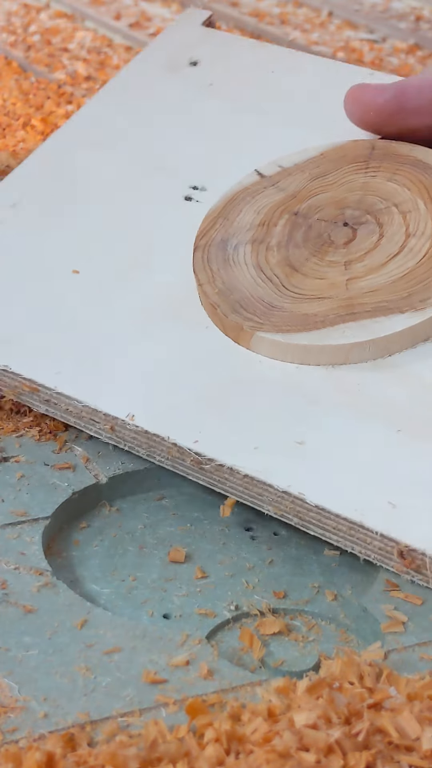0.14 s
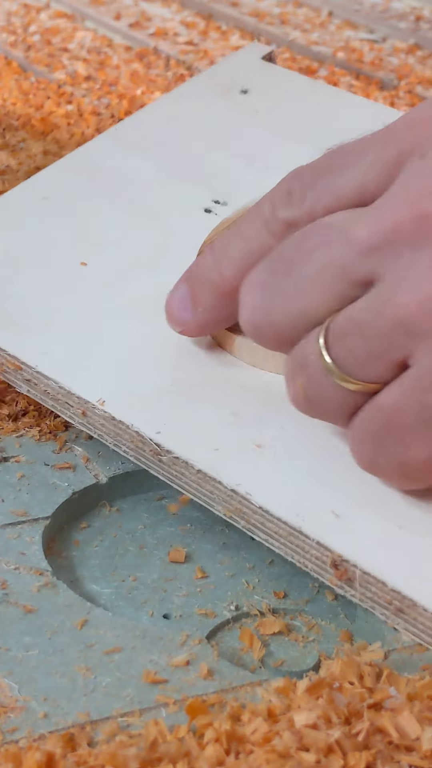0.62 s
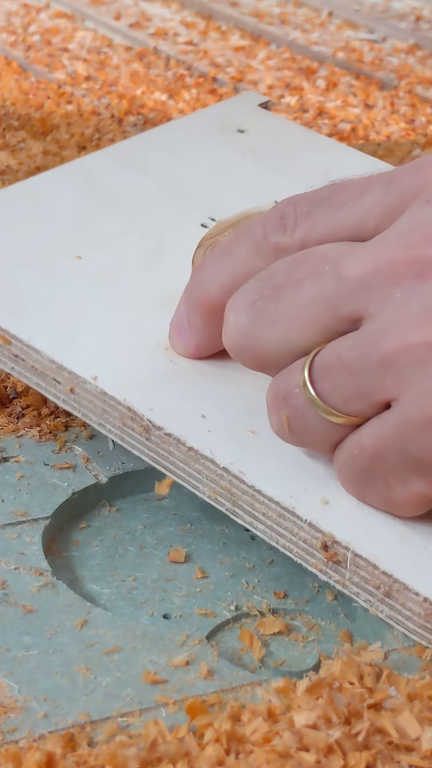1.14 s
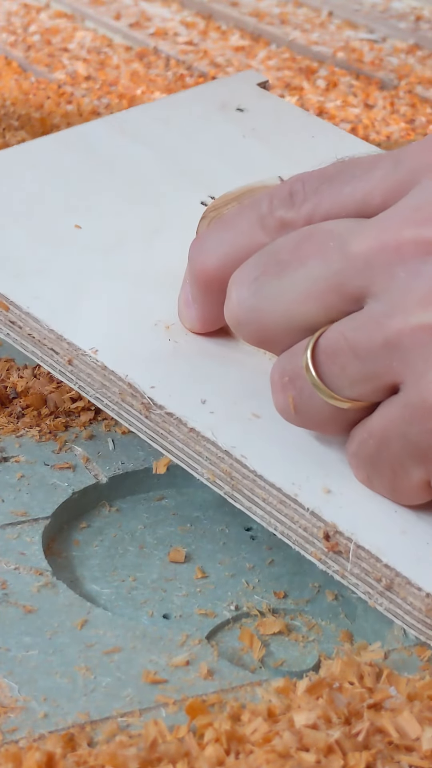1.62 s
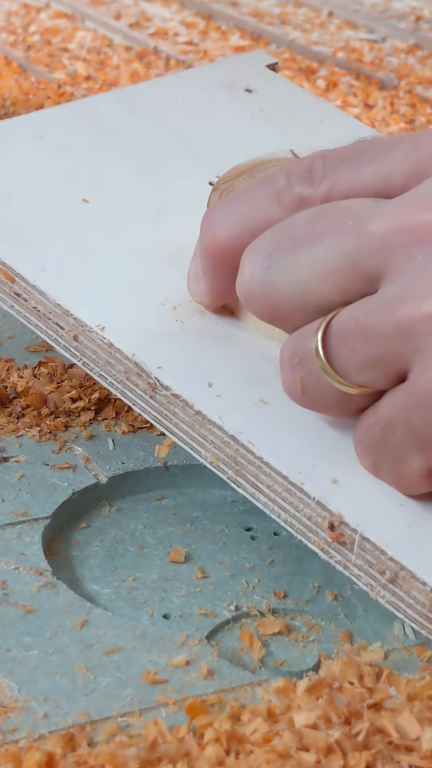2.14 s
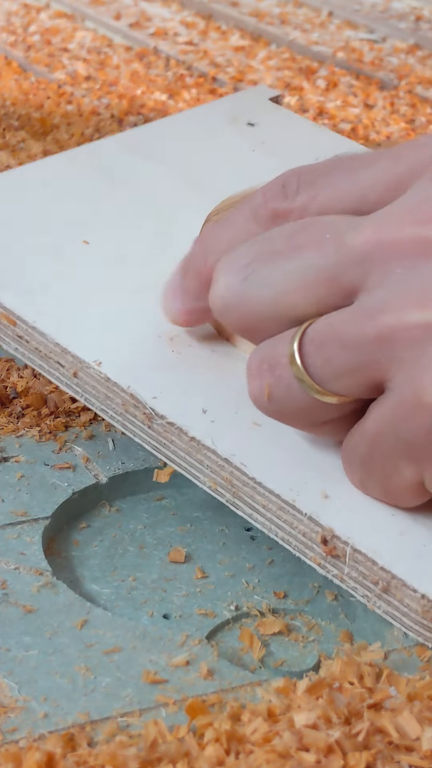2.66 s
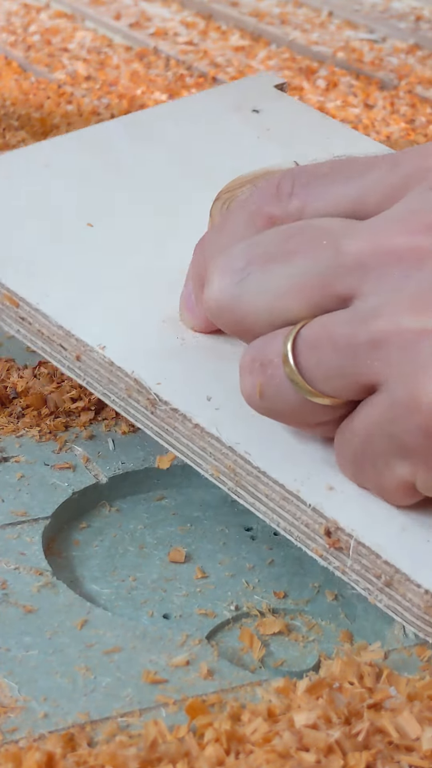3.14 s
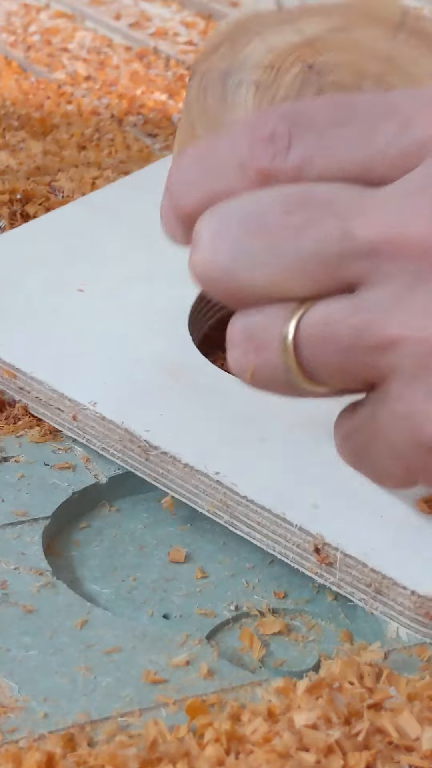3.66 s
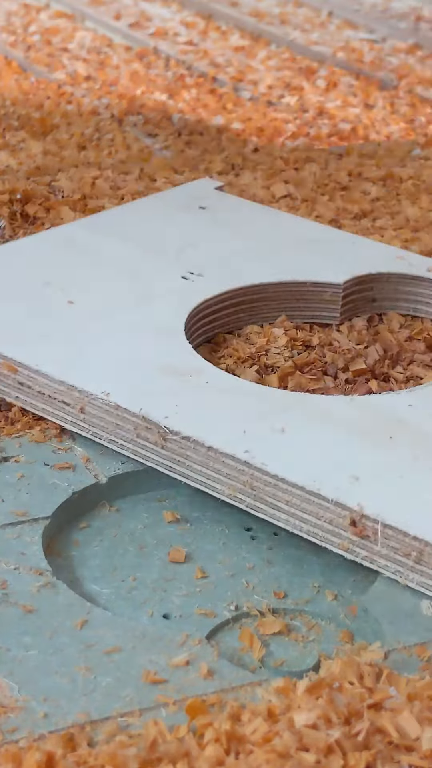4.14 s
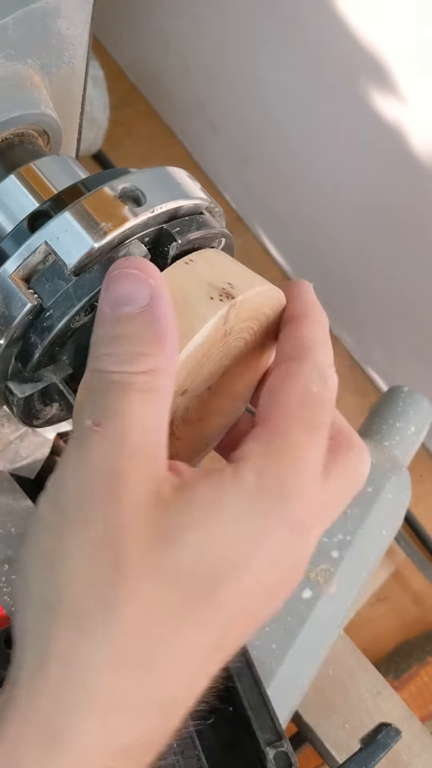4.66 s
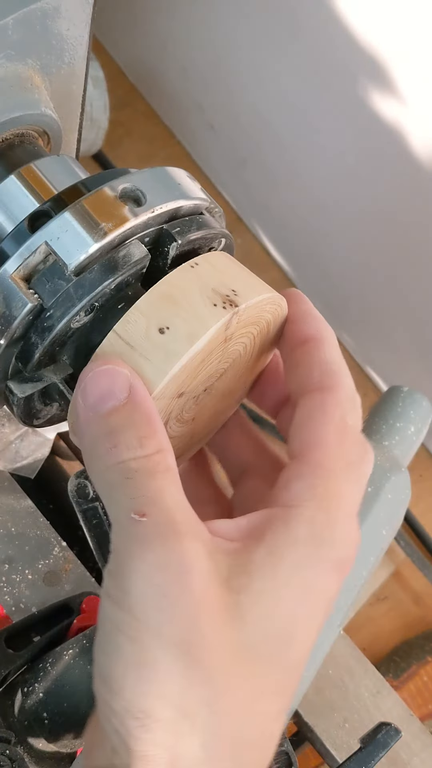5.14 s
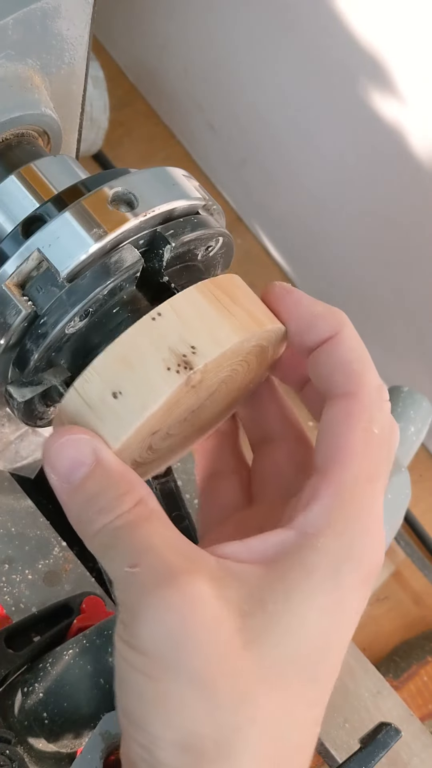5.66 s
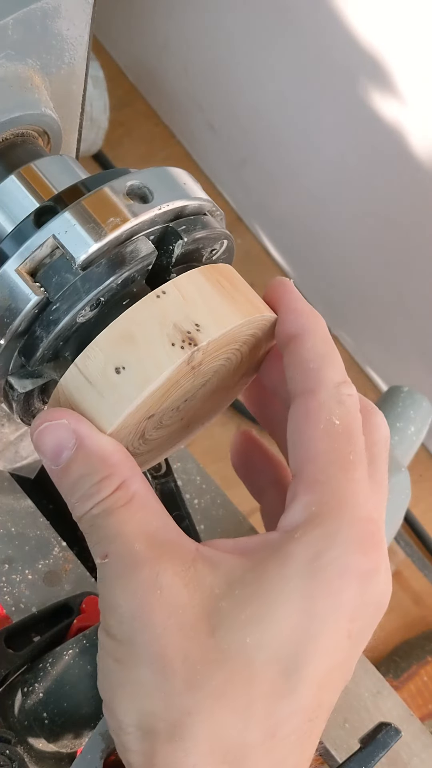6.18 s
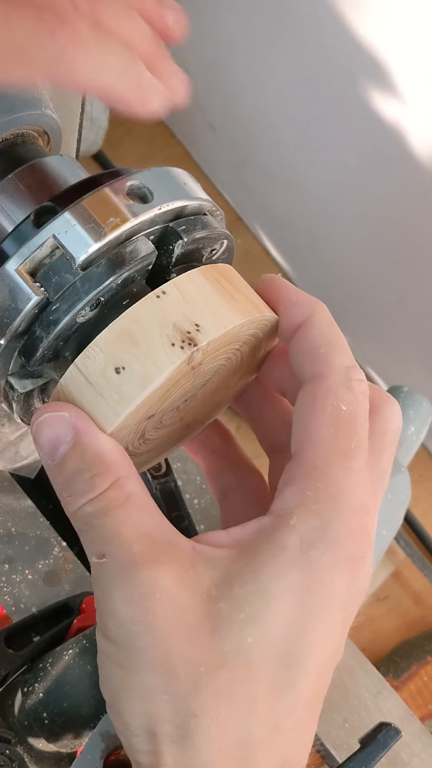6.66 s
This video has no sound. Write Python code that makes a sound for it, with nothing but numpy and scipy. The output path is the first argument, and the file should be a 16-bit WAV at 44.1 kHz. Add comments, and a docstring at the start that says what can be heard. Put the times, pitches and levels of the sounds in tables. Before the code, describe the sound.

Wooden disc snaps and squeaks out of a plywood sheet over a faint machine whine, then knocks into a steel lathe chuck.

```python
"""Quiet workshop in two scenes, heard by a two-port microphone over hum, rumble and room air. First a wooden disc
is pressed out of a plywood sheet while an idle machine whines: snaps and knocks ring damped modes, crack and wake
frame and room; hands rub (filtered noise), the tight fit squeaks, the sheet drags and drops (narrow noise bands).
Then the disc is seated in a steel lathe chuck: a soft bump rings the bed, the jaws knock in longer steel modes,
hands rub, and faint, thin rising chirps sound near the end, over a blurred whistle that dies away."""
import sys
import numpy as np
from scipy import signal
from scipy.fft import rfft, irfft, next_fast_len
from scipy.io import wavfile
from scipy.ndimage import map_coordinates

SR = 44100
rng = np.random.default_rng(int(sys.argv[2]) if len(sys.argv) > 2 else 0)


def store_wav(level_fs):
    """Save 16-bit WAV to argv[1]."""
    pcm = np.round(np.clip(np.atleast_2d(level_fs), -1, 1) * 32767)
    wavfile.write(sys.argv[1], SR, pcm.T.astype(np.int16))


def invert_db(level):
    """Linear amplitude ratio for a level in decibels (20 dB per decade), elementwise."""
    return 10 ** (np.asarray(level, dtype=float) / 20)


N = 299439
CUT_S = 4.327  # from the sheet on the table to the lathe
TABLE_LAG_SAMPLES, LATHE_LAG_SAMPLES = -4, -3.5  # delay of the left port behind the right, in samples; negative: left first


def unit(x):
    """Scale to rms 1."""
    return x / np.sqrt(np.mean(x ** 2) + 1e-20)


def along(points, hz):
    """Interpolate (hz, value) points on a log frequency axis."""
    f, v = np.transpose(points)
    return np.interp(np.log(hz + 1), np.log(f + 1), v)


def wobble(rate_hz):
    """Smooth random curve with rate_hz knots a second."""
    knots = rng.standard_normal(int(N * rate_hz / SR) + 4)
    return map_coordinates(knots, [np.arange(N) * rate_hz / SR])


def at_table():
    """True for samples before the cut."""
    return np.arange(N) < CUT_S * SR


def filtered(x, response):
    """Multiply the spectrum of x by a response(hz), complex or real."""
    n = x.shape[-1]
    m = next_fast_len(n + 8192)
    return irfft(rfft(x, m) * response(np.fft.rfftfreq(m, 1 / SR)), m)[..., :n]


def rush(spectrum):
    """Stereo noise of rms 1; the mid/side split sets the likeness of the ports at each frequency."""
    # hz, left_right_correlation
    alike = [(60, 1), (130, 0.74), (290, 0.6), (640, 0.52), (1410, -0.48), (3100, -.35), (6820, -0.1)]

    def mid_side(hz):
        angle = np.arccos(np.clip(along(alike, hz), -1, 0.92)) / 2
        return invert_db(along(spectrum, hz)) * [np.cos(angle), np.sin(angle)]

    mid, side = filtered(rng.standard_normal((2, N)), mid_side)
    return unit(np.array([mid + side, mid - side]))


def near(x):
    """Close source: reaches the left port first, with a port balance set by frequency and place."""
    # balance at the table: hz, left_over_right_db
    table_left = [(60, 17), (180, 7), (550, 2.5), (1650, 2), (4970, 13.5), (15000, -13.5)]
    # balance at the lathe: hz, left_over_right_db
    lathe_left = [(60, 7), (180, 3.5), (550, 1), (1650, -0.5), (4970, 1), (15000, 12)]
    side = np.array([[1], [-1]]) / 2

    def place(lag_samples, left):
        def response(hz):
            delay = np.exp(-2j * np.pi * hz * side * lag_samples / SR)
            return invert_db(side * along(left, hz)) * delay
        return filtered(x, response)

    table = place(TABLE_LAG_SAMPLES, table_left)
    lathe = place(LATHE_LAG_SAMPLES, lathe_left)
    return np.where(at_table(), table, lathe)


def cluster(bands, rise_s, shared):
    """Modes too close to count beat together: narrow dying noise, bands x ports x samples."""
    rattle_db, rattle_rate_hz = 3, 73  # loose parts make the ringing uneven
    hz, width_hz, db, t60_s = np.transpose(bands)[:, :, None, None]
    t = np.arange(SR) / SR
    common, left, right = rng.standard_normal((3, SR))
    source = shared * (1 + 400 / hz) * common + [left, right]  # long waves reach both ports alike
    narrow = filtered(source, lambda f: 1 / (1 + ((f - hz) / (width_hz / 2)) ** 4))
    narrow = narrow / narrow.std((1, 2), keepdims=True)
    knots = rng.standard_normal((len(bands), rattle_rate_hz + 2))
    rattle = np.array([np.interp(t * rattle_rate_hz, np.arange(len(k)), k) for k in knots])[:, None]
    return narrow * invert_db(rattle_db * rattle + db - 60 * t / t60_s) * (1 - np.exp(-t / rise_s))


def tones(lines, waver_db, drift_rad):
    """Sines unsteady in level and phase, the phase offset between ports growing with frequency."""
    t = np.arange(N) / SR
    port_phase = np.array([[1], [-1]]) * np.pi * TABLE_LAG_SAMPLES / SR
    total = np.zeros((2, N))
    for hz, rms_db in lines:
        level = np.sqrt(2) * invert_db(rms_db + waver_db * wobble(8.8))
        drift = drift_rad * np.sqrt(hz / 800) * wobble(6.7)
        total += level * np.sin(2 * np.pi * hz * t + drift - port_phase * hz)
    return total


def whistle(hz, rms_db, left_db, wander_hz, rate_hz):
    """One thin line that never holds its pitch: a sine of randomly wandering frequency."""
    phase = 2 * np.pi * np.cumsum(hz + wander_hz * wobble(rate_hz)) / SR
    balance_db = left_db * np.array([[0.5], [-0.5]])
    return np.sqrt(2) * invert_db(rms_db + 2.3 * wobble(8) + balance_db) * np.sin(phase)


def hum():
    """Mains-driven motor in both scenes: low, drifting lines."""
    # hz, rms_db
    hum_lines = [(119, -66.5), (247, -81.5)]
    return tones(hum_lines, waver_db=1.5, drift_rad=2.4)


def rumble():
    """Lumpy low noise, its level and colour changing at the cut."""
    # one table a scene: time_s, level_db
    levels = [
        [(0.0, -63), (2.95, -71.5), (3.6, -63.5), (4.1, -65.5)],
        [(4.4, -67), (6.32, -70), (6.79, -87)],
    ]
    # one table a scene: hz, level_db_per_hz
    colours = [(15, -5), (30, 0.5), (55, 15), (85, -10.5), (130, -46.5)], [(15, -40), (30, -13.5),
               (55, 6.5), (85, 3.5), (130, -29)]
    t = np.arange(N) / SR
    table, lathe = [invert_db(np.interp(t, *np.transpose(rows))) * rush(colour)
                    for rows, colour in zip(levels, colours)]
    return np.where(at_table(), table, lathe)


def table_air():
    """Room air whose low part swells, with the whine of an idle machine and a thin whistle."""
    # hz, level_db_per_hz
    air_colour = [(60, -12), (90, -4), (130, -8.5), (160, -12.5), (250, -15), (700, -16.5), (1150, -22.5),
                  (2350, -18.5), (3000, -28.5), (5500, -32), (7300, -44), (9600, -36), (15800, -42.5)]
    # idle machine: hz, rms_db
    whine_lines = [(500, -75.5), (646, -77), (807, -67.5), (1846, -80), (2353, -77.5)]
    steady = invert_db(-59.5) * rush(air_colour)
    low = filtered(steady, lambda hz: hz < 1480)
    swell = (invert_db(2.0 * wobble(11)) - 1) * low
    whine = tones(whine_lines, waver_db=1.04, drift_rad=0.13)
    return steady + swell + whine + whistle(6745, rms_db=-86.5, left_db=4.5, wander_hz=33.5, rate_hz=6)


def lathe_air():
    """Wavering room air and a dying whistle that wanders so fast that it blurs into a band."""
    # hz, level_db_per_hz
    air_colour = [(53, -69), (90, -22), (102, -5.5), (124, -8), (289, -23.5), (476, -26.5), (1180, -35),
                  (1290, -29.5), (1670, -33.5), (6370, -44.5), (7250, -55), (10900, -52), (15800, -47)]
    fade_db_per_s = 4
    after_cut_s = np.arange(N) / SR - CUT_S
    blur = whistle(2480, rms_db=-82, left_db=0, wander_hz=160, rate_hz=400)
    return invert_db(-61 + 1.5 * wobble(6.3)) * rush(air_colour) + blur * invert_db(-fade_db_per_s * after_cut_s)


def rubs():
    """Sliding wood is uneven grit through the resonances of sheet or disc; skin only hisses."""
    # strokes of hands and sheet: start_s, length_s, scrape_db, skin_hiss_db
    strokes = [(-.05, 0.31, -70.5, -75), (0.165, 0.21, -63.5, -77), (0.365, 0.26, -63, -84),
               (0.591, 0.25, -65.5, -87), (2.83, 0.067, -64, -89), (2.959, 0.027, -63.5, -90),
               (3.42, 0.064, -47, -61), (3.725, 0.67, -65.5, -69.5), (4.072, 0.086, -68, -70),
               (4.186, 0.016, -49.5, -60), (4.214, 0.065, -63, -78), (4.299, 0.19, -69, -66.5),
               (4.606, 0.046, -60, -70), (5.038, 0.24, -63, -62), (5.245, 0.029, -47.5, -67),
               (5.269, 0.019, -47.5, -75), (5.335, 0.12, -62, -68), (5.522, 0.16, -67, -75.5),
               (5.691, 0.13, -66.5, -69), (5.754, 0.056, -53.5, -72), (5.879, 0.058, -59, -66),
               (6.112, 0.013, -44.5, -57.5), (6.595, 0.2, -79.5, -72.5)]
    # sheet resonances: hz, width_hz, level_db
    sheet_peaks = [(606, 2730, 5), (1550, 520, 11.5), (2345, 180, 8), (2900, 410, 10), (3680, 850, 0.5),
                   (4560, 290, 8.5), (5860, 1500, -2), (6580, 1700, -24)]
    # disc on jaws: hz, width_hz, level_db
    grip_peaks = [(885, 1500, 4), (1330, 150, 7.5), (2700, 590, -10), (5760, 570, -13)]
    # skin hiss: hz, level_db_per_hz
    skin_colour = [(5000, -11), (7500, -5), (9000, -6), (9800, 1), (10700, -4), (11800, 0), (12700, -8.5),
                   (14400, -10), (15800, -9)]
    grip_top_hz = 7040
    start_s, length_s, scrape_db, hiss_db = np.transpose(strokes)
    progress = np.clip((np.arange(N)[:, None] / SR - start_s) / length_s, 0, 1)
    pressure = np.sin(np.pi * progress ** 0.7) ** 0.7  # rises fast, eases off
    grit = rng.standard_normal(N) * invert_db(1.0 * wobble(9.1) + 0.72 * wobble(40) + 3.2 * wobble(300))

    def body(peaks):
        def response(f):
            total = 0
            for k, (hz, width_hz, db) in enumerate(peaks):
                damping = 1j * f * width_hz
                total = total + (-1) ** k * invert_db(db) * damping / (hz * hz - f * f + damping)
            return total
        return unit(filtered(grit, response))

    grip = filtered(body(grip_peaks), lambda hz: 1 / (1 + (hz / grip_top_hz) ** 6))
    wood = np.where(at_table(), body(sheet_peaks), grip)
    scrape = near(pressure @ invert_db(scrape_db) * wood)
    hiss = pressure @ invert_db(hiss_db) * invert_db(2.1 * wobble(34)) * rush(skin_colour)
    return scrape + hiss


def chirps():
    """Faint, thin rising chirps near the end: upward sine glides that swell and fade."""
    # start_s, start_hz, peak_db
    glides = [(6.619, 9600, -65.5), (6.652, 12650, -79)]
    length_s, glide_hz_per_s = 0.029, 14900
    start_s, hz, db = np.transpose(glides)[:, :, None]
    t = np.clip(np.arange(N) / SR - start_s, 0, length_s)
    swell = np.sin(np.pi * t / length_s)
    phase = 2 * np.pi * (hz * t + glide_hz_per_s * t ** 2 / 2)
    return near(np.sum(invert_db(db) * swell * np.sin(phase), 0))


def drag():
    """The freed sheet slides over the table, singing in narrow uneven bands, then drops with a rumble."""
    # singing: hz, width_hz, level_db
    drag_bands = [(1510, 140, -67.5), (1900, 150, -67), (2170, 150, -63), (2450, 120, -64.5),
                  (3530, 260, -60.5), (4480, 500, -65.5), (5430, 440, -67.5)]
    # drop rumble: hz, width_hz, level_db, t60_s
    drop_bands = [(40, 28, -53.5, 1), (100, 120, -52, 0.39), (353, 490, -53.5, 0.45)]
    start_s, length_s, drop_s = 3.87, 0.29, 4.192
    song, thud = np.zeros((2, 2, N))
    undying = [(*band, np.inf) for band in drag_bands]
    song[:, round(start_s * SR):][:, :SR] = cluster(undying, rise_s=0.18, shared=0.42).sum(0)
    thud[:, round(drop_s * SR):][:, :SR] = cluster(drop_bands, rise_s=0.0028, shared=1.7).sum(0)
    progress = np.clip((np.arange(N) / SR - start_s) / length_s, 0, 1)
    pressure = np.sin(np.pi * progress ** 1.4) ** 0.2  # grows until the sheet lifts
    return song * pressure * invert_db(1.9 * wobble(31)) + thud * at_table()


def squeaks():
    """Brief slips of the tight fit each ring one band; the shorter, the wider."""
    # start_s, hz, level_db, t60_s
    slips = [(0.102, 12400, -46, 0.018), (2.622, 2470, -42, 0.014), (2.689, 1910, -51, .02),
             (2.848, 2900, -54, .06), (2.963, 2700, -50, 0.022), (2.987, 2855, -50, .09),
             (4.132, 2180, -48, 0.084), (4.134, 2450, -50, .07), (4.134, 1900, -55, .06),
             (5.251, 2700, -42, .04), (5.274, 2700, -42, 0.044), (5.426, 2700, -56, .04),
             (5.519, 2700, -48.5, .05), (5.789, 2800, -40.5, 0.018)]
    width_times_t60 = 12.6
    x = np.zeros((2, N + SR))
    for start_s, hz, db, t60_s in slips:
        band = (hz, width_times_t60 / t60_s, db, t60_s)
        x[:, round(start_s * SR):][:, :SR] += cluster([band], rise_s=0.17 * t60_s, shared=2.9)[0]
    return x[:, :N]


def bed_bump():
    """A soft bump sets the lathe bed ringing in clusters of modes."""
    # start_s, level_db
    bumps = [(4.609, -41)]
    # hz, width_hz, level_db, t60_s
    bed_bands = [(225, 130, -5, 0.26), (400, 280, -9.5, 0.35), (695.5, 90, -5.5, 0.45),
                 (1320, 130, -20, 0.79), (1742, 300, -24.5, 0.17), (2000, 2000, -22, .5),
                 (2730, 170, -16, 0.33)]
    x = np.zeros((2, N + SR))
    for start_s, db in bumps:
        x[:, round(start_s * SR):][:, :SR] += invert_db(db) * cluster(bed_bands, rise_s=0.00077, shared=1.2).sum(0)
    return x[:, :N]


def ring(modes, rise_s, sustain):
    """Dying sines, one row a mode; each contact point varies strengths, phases and upper pitches."""
    hz, db, t60_s = np.transpose(modes)[:, :, None]
    t = np.arange(SR // 2) / SR
    level_luck, phase_luck, pitch_luck = rng.standard_normal((3, len(modes), 1))
    hz = hz * (1 + 0.04 * pitch_luck * (hz > 1600))
    level = invert_db(db + 2.5 * level_luck - 60 * t / (t60_s * sustain))
    return level * np.sin(2 * np.pi * hz * t + 0.5 * phase_luck) * (1 - np.exp(-t / rise_s))


def tail(colour, shared):
    """Fresh stereo room answer: dense early scatter, then each frequency dies at its own speed."""
    # hz, t60_s
    room_decay = [(200, 0.11), (700, 0.52), (1500, 0.45), (4000, 0.63), (8000, 0.58), (14000, 0.33)]
    common, left, right = rng.standard_normal((3, SR))
    hz, t, z = signal.stft([shared * common + left, shared * common + right], SR, nperseg=256)
    late = invert_db(-60 * t / along(room_decay, hz)[:, None])
    early = invert_db(3.0 - 60 * t / 0.086)
    z = z * invert_db(along(colour, hz)[:, None]) * (late + early)
    x = signal.istft(z, SR, nperseg=256)[1][:, :SR]
    return x / x[:, :SR // 20].std() * (1 - np.exp(-np.arange(SR) / SR / 0.00075))


def crack(level_db, edge_hz, t60_s):
    """Splintering: three dying noises above 1800 Hz, the treble rolled off at edge_hz."""
    t = np.arange(SR // 2) / SR
    noise = rng.standard_normal((3, len(t)))
    bright = filtered(noise, lambda hz: (hz > 1800) / (1 + (hz / edge_hz) ** 4))
    return bright * invert_db(level_db - 60 * t / t60_s)


def knocks(events, modes, frame, colour, middle, edge, room_db, crack_t60_s, shared):
    """Each contact shares its force among modes by pitch, cracks, and wakes frame and room."""
    firm_db = -28.5  # below it the hand damps the ring
    dry, wet = np.zeros(N + SR), np.zeros((2, N + SR))

    def group(table):
        return np.digitize(np.array(table)[:, 0], [550, 1100, 1620, 3400])  # Hz

    for start_s, strength_db, hard_db, weight_db in events:
        at = round(start_s * SR)
        crack_db = strength_db + hard_db
        # middle: base dB, dB gained per dB of hardness, dB lost per dB of weight
        middle_db = middle[0] + middle[1] * hard_db - middle[2] * weight_db
        upper_db = -3.5 + 0.63 * hard_db
        top_db = hard_db - 7
        force = invert_db(strength_db + np.array([weight_db, 0, middle_db, upper_db, top_db]))

        rise_s = 0.0014 * invert_db(-0.25 * hard_db)  # hard blows rise faster
        sustain = invert_db(0.15 * min(strength_db - firm_db, 0))
        # edge: Hz at no hardness, dB it climbs per dB of hardness
        splinter = crack(crack_db, edge[0] * invert_db(edge[1] * hard_db), crack_t60_s)
        half = slice(at, at + SR // 2)
        dry[half] += force[group(modes)] @ ring(modes, rise_s, sustain) + 0.25 * splinter[0]
        wet[:, half] += 0.38 * splinter[1:]  # scatters differently to each port

        # room_db: under the crack, under the strength
        answer = np.hypot(invert_db(crack_db - room_db[0]), invert_db(strength_db - room_db[1]))
        frame_ring = cluster(frame, rise_s=0.00091, shared=0.46)
        wet[:, at:at + SR] += answer * tail(colour, shared)
        wet[:, at:at + SR] += np.tensordot(force[group(frame)], frame_ring, 1)
    # the knocks carry no deep bass
    return filtered(near(dry[:N]) + wet[:, :N], lambda hz: 1 / (1 + (110 / (hz + 1)) ** 4))


def chuck_knocks():
    """The disc knocks on the jaws of the steel chuck: steel modes over the lathe frame."""
    # start_s, strength_db, hardness_db (crack over strength), weight_db (thud over strength)
    seats = [(4.7991, -26, 27, -11), (4.8151, -29, 18, -8.5), (5.248, -51.5, 18, -2.5),
             (5.2923, -37, -16.5, -15.5), (5.4216, -47.5, -27, -11), (5.5051, -45, -7, -13),
             (5.7603, -50, -7, -8.5), (5.779, -42, -10.5, -24), (5.8176, -44.5, -16.5, -7.5),
             (5.8724, -52.5, -5, 1.5), (5.9133, -27.5, 10, -19), (5.9229, -27.5, 16, -19),
             (5.9281, -28.5, 8.5, -39.5), (6.1081, -40, -3.5, -12)]
    # chuck modes: hz, level_db, t60_s
    chuck_modes = [(184, 2, 0.07), (249, -5.5, 0.041), (850, 0, 0.061), (1050, -1.5, 0.076),
                   (1254, 4, 0.045), (1334, 0, .04), (1618, -4, 0.043), (1995, 1, 0.028), (2377, 5, 0.016),
                   (3087, 1, .02), (4000, 1.5, 0.019), (5385, -6, 0.04), (7540, -24, 0.026)]
    # mode clusters of the lathe frame: hz, width_hz, level_db, t60_s
    frame_bands = [(250, 140, -7.5, 0.55), (840, 150, -19.5, 0.31), (1240, 350, -25, 0.5),
                   (1335, 60, -31, 1.1), (1744, 400, -29, 0.64), (2570, 740, -24, 0.55),
                   (3830, 350, -33, 0.5), (5495, 1500, -34, 0.47), (7410, 600, -36.5, 0.3)]
    # room tail: hz, level_db_per_hz
    tail_colour = [(90, -60.5), (200, -14), (500, 0.5), (1000, -0.5), (2000, -0.5), (4000, -7.5),
                   (6000, -16), (8000, -21), (12000, -20), (15800, -45)]
    return knocks(seats, chuck_modes, frame_bands, tail_colour, middle=(-0.54, 0.23, 0.26),
                  edge=(4620, 0.25), room_db=(32, 21), crack_t60_s=0.018, shared=0.92)


def sheet_snaps():
    """The disc snaps and knocks against the plywood sheet: short wood modes, silent from the cut."""
    # start_s, strength_db, hardness_db (crack over strength), weight_db (thud over strength)
    snaps = [(0.395, -61, -7, 9), (0.413, -51, -2, -2.5), (0.4274, -46.5, -32, -8),
             (0.7684, -40.5, -19, -10.5), (0.8673, -46.5, 9.5, -24), (0.944, -43, 0, -35),
             (1.0422, -38.5, 6, -18), (1.1472, -39, 13, -22), (1.3628, -29, 0, -5),
             (1.8248, -33.5, 5.5, -31), (2.1965, -34.5, 8.5, -23.5), (3.2837, -38.5, 17.5, -18.5),
             (3.4214, -34, 13, -23), (3.4339, -36.5, 0, -12), (4.1917, -53.5, 20.5, 0), (4.238, -56, -5, 1)]
    # sheet modes: hz, level_db, t60_s
    sheet_modes = [(265, 0, 0.081), (530, -5, 0.037), (694, 2, 0.047), (926, -1.5, 0.029), (1503, 0, 0.027),
                   (1794, 6, 0.017), (2190, 15, 0.0071), (2700, 4, 0.011), (3840, 8.5, 0.0053),
                   (5130, -14, 0.036)]
    # mode clusters of the table frame: hz, width_hz, level_db, t60_s
    frame_bands = [(156, 110, -6.5, 0.41), (244.6, 43, -12.5, 0.64), (527, 670, -10.5, 0.24),
                   (610, 420, -21.5, 0.76), (1470, 280, -22.5, 0.62), (1890, 420, -30, 0.65)]
    # room tail: hz, level_db_per_hz
    tail_colour = [(180, -63), (300, -48), (423, -12), (559, -10), (763, -5), (814, -29.5), (1090, -2),
                   (1350, -12), (1540, -27), (1910, -7), (4690, -16), (7060, -28), (15000, -35)]
    x = knocks(snaps, sheet_modes, frame_bands, tail_colour, middle=(-6, 0.35, 0.4),
               edge=(8000, 0.045), room_db=(27.5, 28), crack_t60_s=0.017, shared=0.2)
    return x * at_table()


def scene():
    """Air, hum and rumble, then all that rubs, slips and drags, then the knocks at table and lathe."""
    background = np.where(at_table(), table_air(), lathe_air()) + rumble() + hum()
    handling = rubs() + drag() + squeaks()
    return background + handling + chirps() + bed_bump() + chuck_knocks() + sheet_snaps()


def band_limit(x):
    """A steep low-pass at the top of the band."""
    return signal.sosfilt(signal.butter(12, 16670, fs=SR, output="sos"), x)


def record(dry):
    """Unequal ports, a preamplifier that rounds off the peaks, then a band limit."""
    left_db, ceiling, top_hz = 0.8, 0.92, 15830  # the left port is more sensitive
    x = dry * invert_db([[left_db / 2], [-left_db / 2]])
    x = x / (1 + np.abs(x / ceiling) ** 6) ** (1 / 6)
    mix = filtered(x, lambda hz: hz < top_hz)
    return band_limit(mix)


dry = scene()
out = record(dry)
store_wav(out)
```